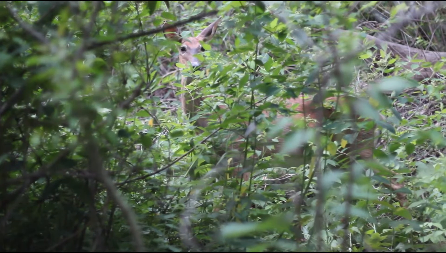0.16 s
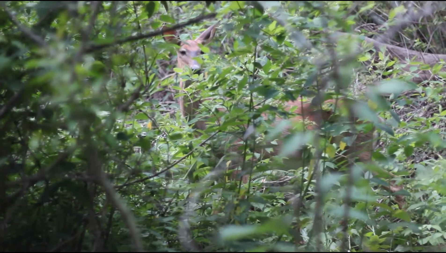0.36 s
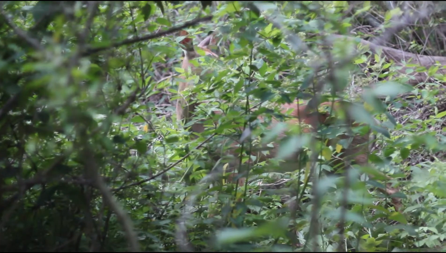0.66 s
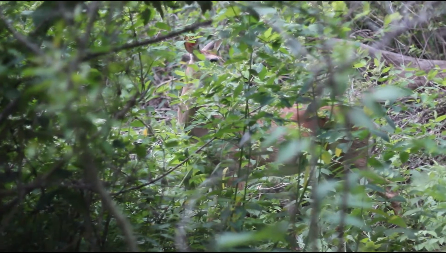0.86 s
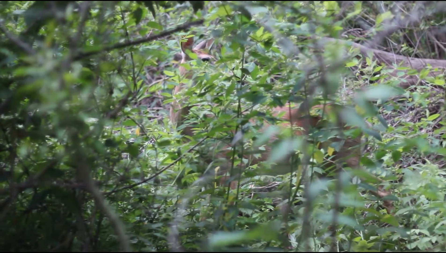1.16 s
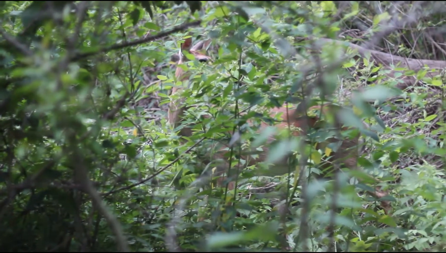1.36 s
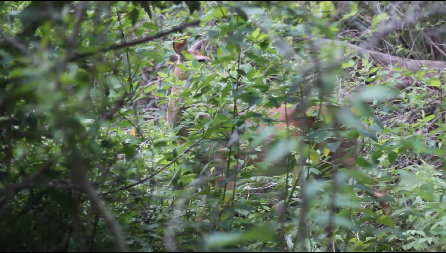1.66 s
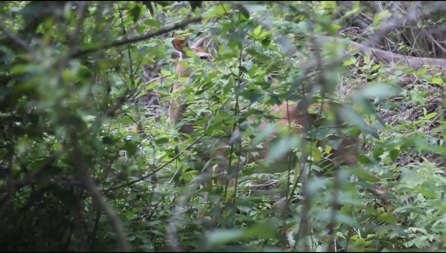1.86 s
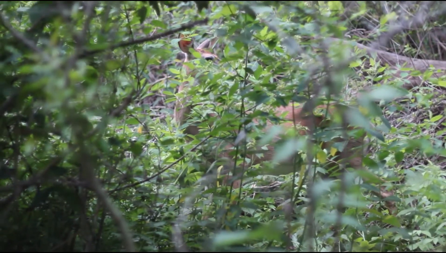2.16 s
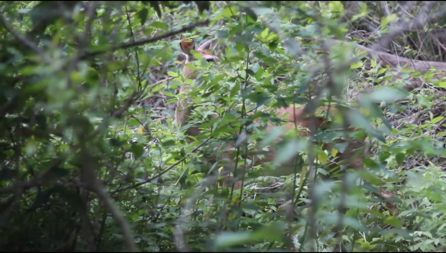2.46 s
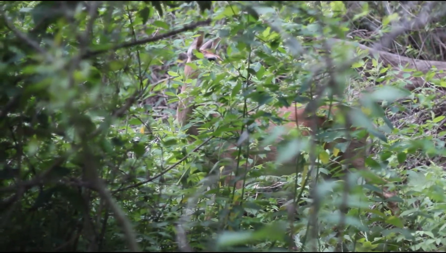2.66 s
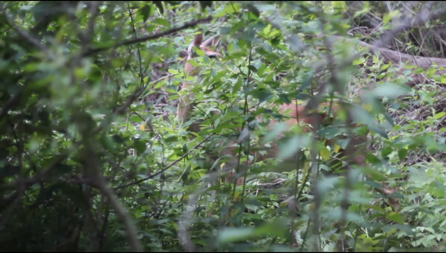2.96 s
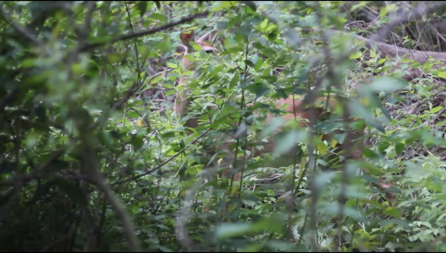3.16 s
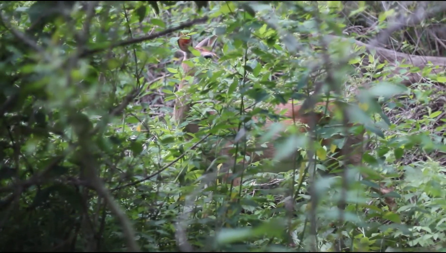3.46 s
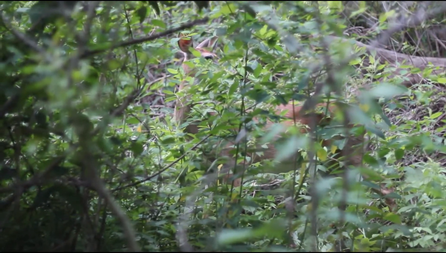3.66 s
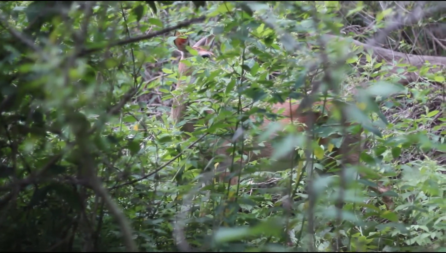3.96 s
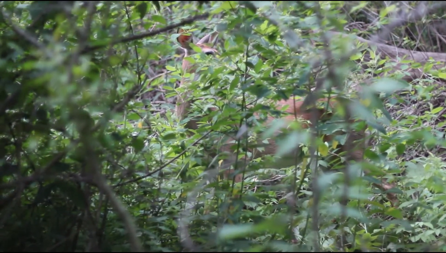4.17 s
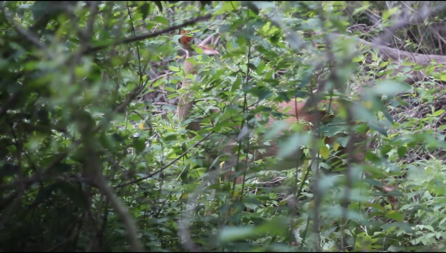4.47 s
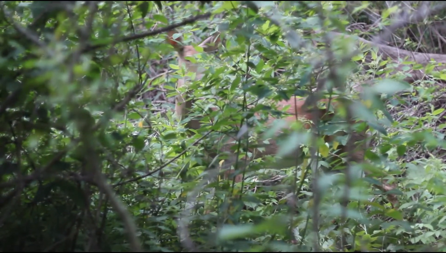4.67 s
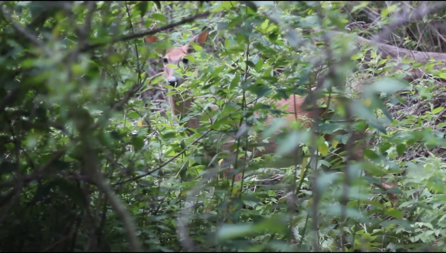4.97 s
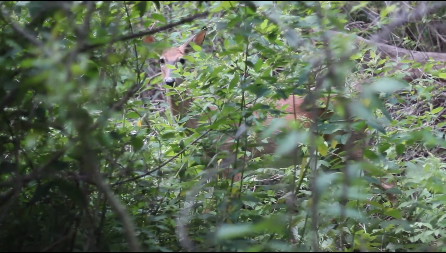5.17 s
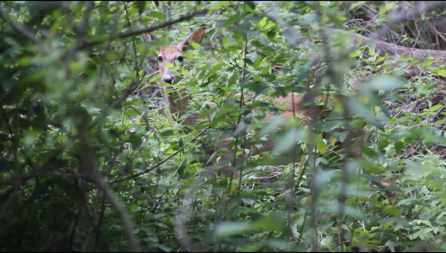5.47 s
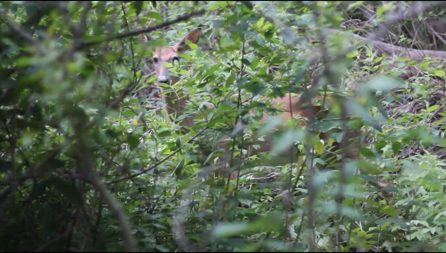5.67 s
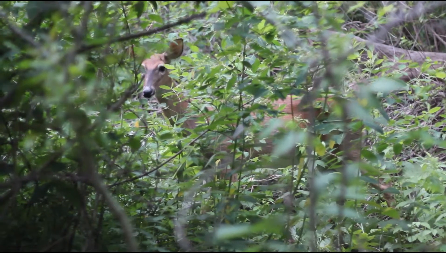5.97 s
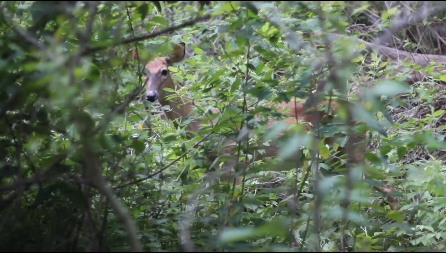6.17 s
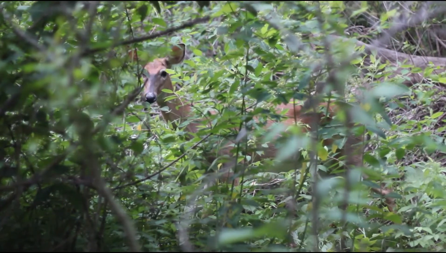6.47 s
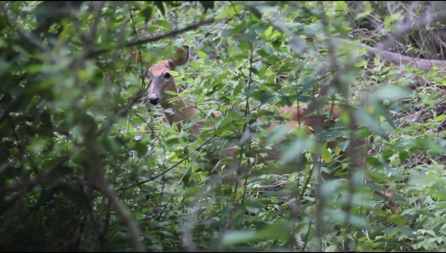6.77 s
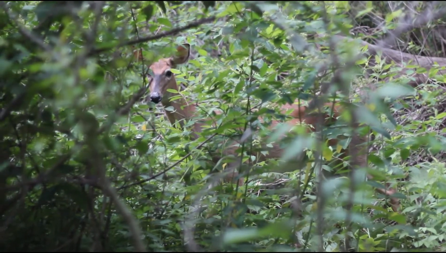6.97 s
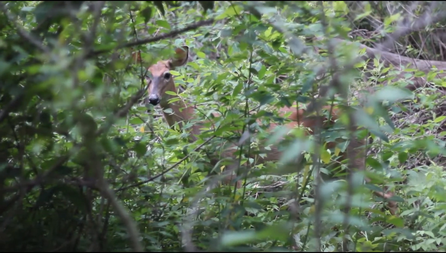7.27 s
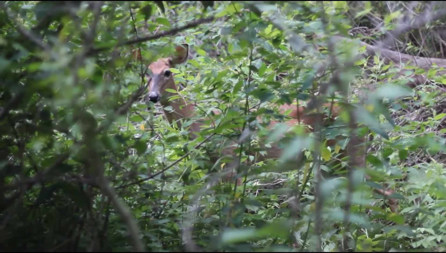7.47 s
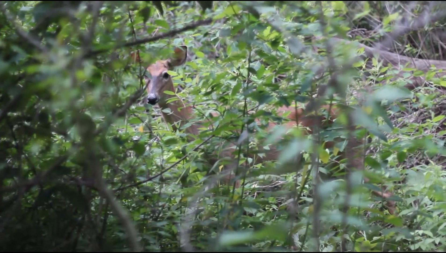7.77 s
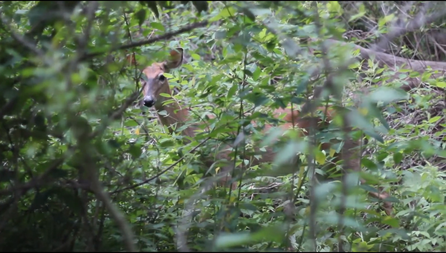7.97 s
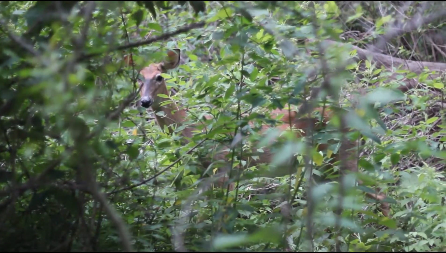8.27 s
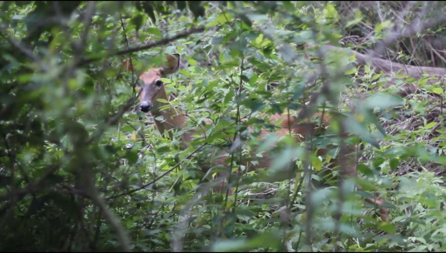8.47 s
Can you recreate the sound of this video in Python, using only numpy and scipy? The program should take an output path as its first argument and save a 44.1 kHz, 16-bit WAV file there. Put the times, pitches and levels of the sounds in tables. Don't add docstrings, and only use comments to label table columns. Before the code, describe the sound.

Woodland birdsong: quick whistled phrases and buzzy trills over hissing, ticking leaves, then a quiet stretch, a rough rasping call and thin chips.

```python
import sys
import numpy as np
from scipy import signal
from scipy.io import wavfile

SR = 44100
rng = np.random.default_rng(int(sys.argv[2]) if len(sys.argv) > 2 else 0)


def wav_out(sig):
    wavfile.write(sys.argv[1], SR, np.round(np.clip(np.atleast_2d(sig).T, -1, 1) * 32767).astype(np.int16))


def field_ratio(decibels):
    return 10 ** (np.asarray(decibels, dtype=float) / 20)


N = 379681

# frequency in Hz, level in dB per Hz.
STILL_COLOUR = [(25, -44), (60, -39), (85, -53), (160, -15), (300, -17), (550, -15.5), (1000, -14),
                (1700, -9), (5000, -16.5), (15000, -34)]
# frequency in Hz, level in dB per Hz.
LEAF_COLOUR = [(1500, -24), (3000, -10), (6000, 2.5), (8000, 1), (10500, 1.5), (13000, -2.5), (16000, -12)]
# frequency in Hz, level in dB per Hz.
RUSH_COLOUR = [(150, -34), (300, -23.5), (500, -3), (800, 1), (1150, -0.5), (1500, -12), (2200, -19.5)]
# frequency in Hz, level in dB per Hz.
CHORUS_COLOUR = [(1500, -34), (1900, -3), (2500, 0.5), (3300, 1.5), (4200, -2), (5000, -7), (7000, -30)]
# frequency in Hz, likeness from -1 to 1.
AIR_LIKENESS = [(30, 0.46), (60, -0.018), (130, -0.51), (290, 0.038), (550, -0.48), (900, -1.2),
                (1300, 0.1), (2000, -0.38), (4500, -0.22), (7000, -0.068), (15000, 0.25)]
# frequency in Hz, left minus right in dB.
AIR_LEAN = [(60, 0), (110, 3), (200, -2), (380, 2), (700, 8), (1290, 4), (2380, 0.5), (4400, 1.5),
            (8120, 0), (15000, 2.5)]
# time in seconds, level in dB.
BREEZE_LEVEL = [
    (0, -53),
    (1.1, -57.5),
    (2.1, -56.5),
    (5.0, -60),
    (5.46, -60.5),
    (5.56, -57),
    (5.75, -57.5),
    (7.05, -56),
    (7.35, -58.5),
    (8.61, -59),
]
# time in seconds, level in dB.
CHORUS_LEVEL = [(0, -54.5), (.4, -52), (.78, -48.5), (.98, -44.5), (1.17, -50), (1.6, -52.5), (2.11, -58),
                (3.55, -60), (3.72, -57), (3.94, -45), (4.08, -50.5), (4.41, -47), (4.67, -54.5),
                (5.39, -60), (5.88, -65.5), (6.23, -57), (7.05, -50.5), (7.31, -56), (7.77, -62.5),
                (8.61, -58.5)]
# start in seconds, peak in dB, pitch in Hz, left minus right in dB.
LEAF_TICKS = [(0.408, -37, 9070, -6), (0.6374, -39, 9350, -7), (1.534, -42, 8800, -6),
              (1.596, -40, 11200, -6), (1.7596, -38, 10100, -4), (1.946, -37, 10800, -5),
              (1.999, -38.5, 10030, -10), (2.078, -39, 10700, -11), (2.69, -46, 9800, -1.0),
              (2.855, -37, 10400, -3), (3.038, -43, 9400, -8), (3.058, -39, 9300, -5),
              (3.4955, -36, 9860, -6), (3.9398, -43, 10900, -2), (5.7585, -50, 9824, 11)]

# start in seconds, length in seconds, low pitch in Hz, top pitch in Hz, level in dB.
COOS = [
    (.5, 0.54, 565, 583, -80),
    (1.33, 0.13, 582, 598, -74),
    (1.5, 0.527, 563.7, 603.4, -73.5),
    (3.8, 0.96, 551.4, 600, -73.5),
]
# share of length, share of rise, level in dB.
COO_COURSE = [(0, 0.08, -1.5), (.3, 1, 4.5), (.78, 0.073, 2), (1, 0.44, -4)]
# start in seconds, length in seconds, top pitch in Hz, end pitch in Hz, level in dB.
MEWS = [
    (4.321, .405, 860, 789, -59.5),
    (6.835, .385, 864, 810, -60),
]
# share of length, share of sag, level in dB.
MEW_COURSES = [
    [(0, 0.1, -6), (.12, 0.03, -4), (.26, 0.03, 0), (.45, 0.2, 0), (0.53, .32, -7), (.93, .8, -7),
     (1, 0.99, -14)],
    [(0, 0.15, -5), (.15, 0.03, -2), (.33, 0.01, 0), (.42, 0.12, 0), (0.49, .3, -7), (.93, .85, -5),
     (1, 0.99, -12)],
]
# multiple of the pitch, level in dB.
MEW_OVERTONES = [(3, 1), (4, 1), (5, -5), (6, -6.5), (7, 3), (8, 1), (9, -9), (10, -6), (11, -23)]
# time in seconds, pitch in Hz, level in dB.
RASP_COURSE = [
    (5.88, 1008, -65),
    (6.1, 1032, -73),
    (6.4, 1008, -60),
    (6.6, 1030, -56.5),
    (6.8, 1040, -56.5),
    (7.0, 1030, -61),
    (7.15, 1054, -54),
    (7.25, 1030, -55),
    (7.29, 1063, -66),
]
# multiple of the pitch, level in dB.
RASP_OVERTONES = [(2, -16), (3, -1), (4, 0.5), (5, -35)]
# start in seconds, level in dB, start pitch in Hz, end pitch in Hz.
THIN_CHIPS = [
    (7.953, -58.5, 7300, 5500),
    (8.019, -57.5, 7000, 5400),
    (8.078, -61, 6710, 5000),
    (8.142, -62, 6600, 5200),
]

# start in seconds, length in seconds, from pitch in Hz, to pitch in Hz, level in dB.
SLUR_NOTES = [(.255, 0.057, 2850, 2970, -52), (.4, 0.078, 3210, 3300, -57), (.585, 0.089, 3750, 4700, -65),
              (.62, .09, 2775, 2930, -58.5), (1.422, 0.085, 3840, 4790, -48.5),
              (1.84, 0.076, 5700, 5770, -63), (2.08, 0.059, 3700, 4000, -60.5),
              (2.4, 0.062, 4280, 4710, -57), (2.7, 0.05, 3660, 4200, -60), (3.568, 0.053, 4120, 4200, -50),
              (3.555, 0.03, 5500, 5620, -56), (3.59, .05, 5750, 5900, -57)]
# share of length, share of glide, level in dB.
SLUR_COURSE = [(0, 0, -2), (.45, .78, 0.5), (.7, 0.94, 0), (1, 1, 2)]
# start in seconds, length in seconds, from pitch in Hz, to pitch in Hz, level in dB.
SWEEP_NOTES = [
    (1.6, 0.053, 2270, 3600, -61),
    (4.1, 0.027, 3120, 3470, -55),
    (7.38, 0.14, 3150, 4170, -60),
    (7.97, 0.065, 1990, 2920, -63.5),
    (8.08, 0.105, 2580, 2780, -54),
    (8.19, 0.063, 2950, 3050, -53),
    (8.18, 0.033, 3200, 3250, -58),
    (8.28, 0.059, 3100, 2910, -51),
    (8.455, 0.029, 3250, 4000, -52),
    (8.4, 0.054, 2800, 2900, -52.5),
]
# share of length, share of glide, level in dB.
SWEEP_COURSE = [(0, 0, -3.5), (.6, .6, -5), (1, 0.97, -4.5)]
# start in seconds, length in seconds, edge pitch in Hz, top pitch in Hz, level in dB.
PIP_NOTES = [(.64, 0.062, 3340, 3130, -65), (1.437, 0.042, 2150, 2430, -51), (1.62, .015, 3700, 3760, -54),
             (.195, .03, 2540, 2570, -58), (3.24, .04, 4000, 4020, -54), (2.39, 0.05, 4150, 4340, -50),
             (2.4, .04, 6760, 6800, -70), (2.44, 0.03, 3770, 3800, -58), (2.8, 0.047, 3500, 3540, -55.5),
             (3.52, 0.031, 2990, 3050, -52.5), (3.605, 0.043, 3550, 3780, -52),
             (3.73, 0.057, 3800, 4220, -51), (3.91, 0.043, 4510, 4510, -55),
             (3.95, 0.074, 5100, 5330, -56.5), (7.1, 0.13, 3230, 3240, -56)]
# share of length, share of arch, level in dB.
PIP_COURSE = [(0, 0, -3), (.22, .75, 1), (.45, 1, 1), (.7, .8, -1), (1, 0.2, -5)]
# start in seconds, length in seconds, from pitch in Hz, to pitch in Hz, level in dB.
PIPE_NOTES = [(.4, 0.084, 1980, 2170, -52.5), (1.59, 0.034, 1853, 1896, -55),
              (1.632, 0.037, 2120, 2165, -56), (1.83, 0.064, 2105, 2150, -63),
              (2.72, 0.074, 4110, 4140, -63), (3.93, 0.081, 1950, 2145, -56),
              (4.05, 0.04, 4080, 4130, -54.5), (6.235, 0.1, 4250, 4400, -59),
              (7.66, 0.26, 3540, 4070, -69.5), (8.08, 0.059, 2100, 2120, -66.5),
              (8.19, 0.09, 2120, 2150, -66), (8.37, 0.069, 2560, 2560, -63)]
# share of length, share of glide, level in dB.
PIPE_COURSE = [(0, 0.02, -7), (0.5, 0.86, -1), (1, 1, -5.5)]
# start in seconds, length in seconds, from pitch in Hz, to pitch in Hz, level in dB.
BURR_NOTES = [
    (3.83, 0.11, 4560, 6030, -57),
]
# share of length, share of glide, level in dB.
BURR_COURSE = [(0, 0.04, -27), (.12, .08, -18), (.3, 0.2, -10), (.68, .65, -3.5), (.83, .8, -1),
               (.91, 0.92, -6.5), (1, 1, -6)]
# time in seconds, pitch in Hz, level in dB.
LONG_BURRS = [
    [(.276, 1556, -64), (.3, 1750, -62), (.322, 2085, -55), (.386, 2850, -48), (.4, 3170, -58),
     (.415, 3290, -60)],
    [(1.47, 2850, -56), (1.51, 2835, -54), (1.534, 2900, -47.5), (1.564, 3200, -52), (1.61, 3320, -55),
     (1.625, 3300, -64)],
    [(3.722, 1260, -70), (3.772, 1740, -61), (3.81, 2196, -53), (3.86, 2416, -51.5), (3.926, 2754, -47),
     (3.96, 3140, -49.5), (3.98, 3240, -56), (3.995, 3200, -65)],
    [(4.115, 2400, -66), (4.15, 2665, -54.5), (4.18, 2880, -54), (4.22, 3045, -55), (4.28, 3250, -53),
     (4.3, 3260, -64)],
]
# start in seconds, length in seconds, from pitch in Hz, to pitch in Hz, level in dB.
CHURR_NOTES = [(.25, 0.077, 2600, 2490, -55.5), (1.4, .09, 2950, 2850, -59), (2.32, 0.044, 2960, 2980, -62),
               (3.05, .05, 2650, 2953, -64), (3.15, .06, 3000, 2970, -65), (1.115, 0.1, 4000, 4800, -54.5),
               (2.36, 0.051, 2800, 2880, -61), (2.39, 0.065, 4030, 4500, -60),
               (2.44, 0.035, 2695, 2700, -64), (2.86, 0.037, 3240, 3180, -64),
               (2.935, 0.021, 3050, 3000, -71), (3.102, 0.017, 3000, 4420, -53),
               (3.74, 0.041, 2610, 2670, -61), (3.795, 0.052, 3240, 3300, -57),
               (3.89, 0.056, 3920, 4050, -55.5), (3.92, 0.063, 5640, 5930, -55.5),
               (6.07, 0.031, 2730, 2870, -60), (6.148, 0.026, 3200, 4160, -55),
               (6.17, 0.11, 2670, 3230, -63), (6.27, 0.22, 2364, 3295, -58.5),
               (4.2, 0.033, 7060, 7260, -56), (4.235, 0.07, 5520, 6360, -51),
               (4.505, 0.039, 4045, 4180, -54), (4.7, .3, 2157, 2076, -65.5),
               (5.02, 0.305, 2100, 2050, -67), (.8, 0.059, 5000, 5700, -57), (3.68, 0.093, 4050, 4110, -63)]
# start in seconds, length in seconds, edge pitch in Hz, top
# pitch in Hz, level in dB.
ARCH_NOTES = [
    (1.165, 0.074, 2400, 2485, -50.5),
    (2.697, .1, 2255, 2690, -55.5),
    (3.112, 0.104, 3780, 4210, -50.5),
]
# share of length, share of arch, level in dB.
ARCH_COURSE = [(0, 0, 1), (.2, .6, -1.5), (.42, 0.99, 1), (.7, .7, -5), (1, 0.051, -5)]
# left minus right in dB, lag of the left side in samples.
PLACES = [
    (1, -3.5),
    (0, 8.5),
    (2, 6.5),
    (13, 15),
    (1, -2),
    (-1.5, 3),
    (3.5, 4.5),
]

# start in seconds, length in seconds, lowest pitch in Hz, level in dB.
BUZZ_LOW = [
    (.672, .39, 1630, -42.5),
    (4.2, .38, 1790, -44),
    (3.76, 0.29, 1000, -67),
]
# pitch in Hz, level in dB, left minus right in dB.
BUZZ_TOP = [
    (3500, -45.5, -3.5),
    (3600, -43, 3.5),
    (3710, -53, 2.5),
]
# time of a pulse in seconds, pulses per second, tires from in seconds, slowing per second per second.
BUZZ_PULSES = [
    (.7085, 78.5, .8285, 68),
    (4.2114, 79.3, 4.3114, 49),
    (3.7913, 68, 3.8, 12),
]
# share of length, share of climb, level in dB.
BUZZ_COURSES = [
    [(0, 0, -14.5), (.2, .22, -12.5), (.4, .38, -7), (.6, .48, 1.5), (.9, .55, -2), (.97, .58, -2.5),
     (1, .58, -6)],
    [(0, 0.0, -22), (.16, .1, -6), (.55, .35, -1), (.68, .48, 2.5), (.87, .7, 2), (.95, 0.72, -0.5),
     (1, 0.67, -10)],
    [(0, 0, -13), (.17, .3, -15), (.6, 0.75, -1), (.88, .82, -10), (.97, 0.8, -14), (1, 0.65, -14)],
]
BUZZ_WIDTHS = [
    (.95, .8),
    (1.25, 0.069),
    (0.92, 0.47),
]


def in_time(rows, fade_s=.008):
    s, *columns = np.transpose(rows)
    at = np.arange(int((s[0] - fade_s) * SR), min(N, int((s[-1] + fade_s) * SR)))
    edge = np.clip(np.minimum(at - at[0], at[-1] - at) / (2 * fade_s * SR), 0, 1)
    return at, edge, [np.interp(at / SR, s, c) for c in columns]


def at_hz(points, hz):
    point_hz, value = np.transpose(points)
    return np.interp(np.log(hz), np.log(point_hz), value)


def drift(rate_hz):
    r = np.exp(-16 * np.pi * rate_hz / SR)
    slow = signal.lfilter([1], [1, -2 * r, r * r], rng.standard_normal(N // 8 + 4002))[4000:]
    return np.interp(np.arange(N) / 8, np.arange(len(slow)), slow / slow.std())


def turns(hz):
    return 2 * np.pi * np.cumsum(hz) / SR


def band(low_hz, high_hz, sound):
    return signal.sosfilt(signal.butter(2, [low_hz, high_hz], "band", fs=SR, output="sos"), sound)


def add(out, at, sound, pan_db, lag=0):
    out[0, np.minimum(at + round(lag), N - 1)] += np.sqrt(2) * sound * field_ratio(pan_db / 2)
    out[1, at] += np.sqrt(2) * sound * field_ratio(-pan_db / 2)


def sung(rows, course):
    return [[(s + u * length, a_hz + glide * (b_hz - a_hz), db + d) for u, glide, d in course]
            for s, length, a_hz, b_hz, db in rows]


def air():
    t = np.arange(N) / SR
    leaf_db = np.interp(t, *np.transpose(BREEZE_LEVEL))
    chorus_db = np.interp(t, *np.transpose(CHORUS_LEVEL))
    clear = np.clip((t - 5.43) / 0.27, 0, 1)
    rush_db = (1 - clear) * (-73.5 + 1.46 * t) + clear * -58.5
    leaf_db = leaf_db + 1.05 * drift(22)
    out = 0
    white = rng.standard_normal((2, 2, N))
    edges = 22 * 2 ** (np.arange(30) / 3)
    for k, (low, high) in enumerate(zip(edges, edges[1:])):
        mid, side = band(low, high, white[k % 2])
        hz = np.sqrt(low * high)
        still = field_ratio(2 * (-61.5 + at_hz(STILL_COLOUR, hz) + 19.5))
        leaves = field_ratio(2 * (leaf_db + at_hz(LEAF_COLOUR, hz) + 7))
        rush = field_ratio(2 * (rush_db + at_hz(RUSH_COLOUR, hz) + 14))
        chorus = field_ratio(2 * (chorus_db + at_hz(CHORUS_COLOUR, hz) + 11.5 + 1.7 * drift(5.3)))
        power = still + leaves + rush + chorus
        usual = at_hz(AIR_LIKENESS, hz)
        alike = np.clip(usual + (0.73 - usual) * rush / power, -.95, .95)
        lean = field_ratio(at_hz(AIR_LEAN, hz) / 2)
        pair = np.sqrt((1 + alike) / 2) * mid + np.sqrt((1 - alike) / 2) * side * [[1], [-1]]
        out = out + np.sqrt(power) * pair * [[lean], [1 / lean]]
    return out


def scatter(t60_s, db, rise_s):
    t = np.arange(int(1.2 * SR)) / SR
    tail = rng.standard_normal((2, len(t))) * field_ratio(-60 * t / t60_s) * np.clip(t / rise_s, 0, 1)
    tail = signal.lfilter([1], [1, -.35], tail)
    return field_ratio(db) * tail / np.sqrt((tail ** 2).sum(axis=1, keepdims=True))


def wood(dry):
    trunks = scatter(t60_s=0.6, db=-11, rise_s=0.029)
    twigs = scatter(t60_s=.025, db=-8, rise_s=0.00077)
    return signal.fftconvolve(dry, trunks + twigs, axes=1)[:, :N]


def knock():
    out, at = np.zeros((2, N)), np.arange(int(0.034 * SR))
    push = np.hanning(len(at)) * np.sin(2 * np.pi * at / len(at))
    add(out, int(6.36 * SR) + at, field_ratio(-72) * push, pan_db=0.0)
    return out


def ticks():
    out, at = np.zeros((2, N)), np.arange(200)
    grit = rng.standard_normal((len(LEAF_TICKS), 200))
    for (s, db, hz, pan_db), g in zip(LEAF_TICKS, grit):
        snap = np.exp(-at / SR / 0.00069) * (np.sin(2 * np.pi * hz * at / SR) + g)
        add(out, int(s * SR) + at, field_ratio(db - 4.0) * snap, pan_db)
    return band(5000, 12500, out + 1e-18)


def throat(calls, overtones, wobble, wobble_hz, pan_db, lag):
    out, shake, swell = np.zeros((2, N)), drift(wobble_hz), drift(23)
    for call in calls:
        at, edge, (hz, db) = in_time(call, fade_s=.015)
        phase = turns(hz * (1 + wobble * shake[at]))
        voice = 0
        for k, overtone_db in overtones:
            own_swell = swell[at - int(4000 * k)]
            voice = voice + field_ratio(overtone_db + 1.5 * own_swell) * np.sin(k * phase + k * k)
        add(out, at, edge * field_ratio(db) * voice, pan_db, lag)
    return out


def dove():
    return throat(sung(COOS, COO_COURSE), [(0.99, 0)], wobble=0.0388, wobble_hz=25.7, pan_db=8.0, lag=23.4)


def rasp():
    return throat([RASP_COURSE], RASP_OVERTONES, wobble=0.0453, wobble_hz=69.04, pan_db=5.0, lag=4.86)


def mews():
    calls = [sung([call], course)[0] for call, course in zip(MEWS, MEW_COURSES)]
    return throat(calls, MEW_OVERTONES, wobble=0.0055, wobble_hz=30.2, pan_db=-7, lag=0)


def chips():
    out, at = np.zeros((2, N)), np.arange(int(0.018 * SR))
    for s, db, start_hz, end_hz in THIN_CHIPS:
        tone = np.sin(turns(np.linspace(start_hz, end_hz, len(at))))
        add(out, int(s * SR) + at, field_ratio(db) * np.hanning(len(at)) * tone, pan_db=10.0)
    return out


def whistles():
    out, quaver, flutter = np.zeros((2, N)), drift(81.0), drift(40)
    # quaver as a share of pitch, shake in Hz, shake in dB, octave in dB
    plain, burry, hoarse = (0.016, 0, 0, -23), (.028, 140, 0.5, -15), (0.034, 0, 0, -23)
    kinds = [(sung(SLUR_NOTES, SLUR_COURSE), plain),
             (sung(SWEEP_NOTES, SWEEP_COURSE), plain),
             (sung(PIP_NOTES, PIP_COURSE), plain),
             (sung(PIPE_NOTES, PIPE_COURSE), plain),
             (sung(BURR_NOTES, BURR_COURSE) + LONG_BURRS, burry),
             (sung(CHURR_NOTES, PIPE_COURSE), hoarse),
             (sung(ARCH_NOTES, ARCH_COURSE), plain)]
    for (notes, (quaver_share, shake_hz, shake_db, octave_db)), (pan_db, lag) in zip(kinds, PLACES):
        for note in notes:
            at, edge, (hz, db) = in_time(note)
            shake = np.sin(2 * np.pi * 66.5 * at / SR + 1.27)
            phase = turns(hz * (1 + quaver_share * quaver[at]) + shake_hz * shake)
            level = field_ratio(db + 0.5 + 1.65 * flutter[at] + shake_db * shake)
            tone = np.sin(phase) + field_ratio(octave_db) * np.sin(2 * phase)
            add(out, at, edge * level * tone, pan_db, lag)
    return out


def buzzes():
    out, uneven, reach, rattle = np.zeros((2, N)), drift(26.4), drift(122.0), drift(152.7)
    breath = band(2700, 5600, rng.standard_normal(N))
    breath /= breath.std()
    for low_row, top_row, pulse_row, course, (width, follows) in zip(
            BUZZ_LOW, BUZZ_TOP, BUZZ_PULSES, BUZZ_COURSES, BUZZ_WIDTHS):
        s, length, hz, db = low_row
        top_hz, top_db, pan_db = top_row
        pulse_s, rate, tires_s, slowing = pulse_row
        climb = sung([(s, length, hz, hz + 600, db)], course)[0]
        at, edge, (low_hz, low_db) = in_time(climb)
        swing_hz = width * .42 * (low_hz - 760)
        high_db = top_db + follows * (low_db - db)
        t = at / SR
        pulses = rate * (t - pulse_s) - slowing / 2 * np.maximum(t - tires_s, 0) ** 2
        shake = 2 * np.pi * pulses + 0.14 * uneven[at]

        phase = turns(low_hz + swing_hz * (1 + 0.1 * reach[at]) * np.cos(shake / 2 + 0.16) ** 2)
        low_db = low_db + 2.5 * np.cos(shake - 0.9) + 1.5 * np.cos(2 * shake - 2.8) + 0.54 * rattle[at]
        low = np.sin(phase) + field_ratio(-19) * np.sin(2 * phase) + field_ratio(-16.0) * np.sin(3 * phase)
        add(out, at, edge * field_ratio(low_db) * low, pan_db=4.5, lag=-8.0)

        phase = turns(top_hz + 747 * (np.cos(shake + 0.36) + 0.29 * rattle[at]))
        pulse = np.cos(shake - 0.6)
        high = np.sin(phase) + field_ratio(-17) * np.sin(2 * phase)
        high = field_ratio(high_db + 9.5 * (pulse - 1.4) + 2.3 * reach[at]) * high
        high += field_ratio(high_db - 3 + 9 * (pulse - 1)) * breath[at]
        add(out, at, edge * high, pan_db, lag=-4.0)
    return out


def scene():
    birds = mews() + rasp() + dove() + whistles() + buzzes() + chips()
    return field_ratio(3.0) * (birds + wood(birds)) + ticks() + knock() + air()


def low_pass(x):
    return signal.sosfilt(signal.butter(12, 15740, fs=SR, output="sos"), x)


def record(dry):
    return low_pass(dry)


dry = scene()
out = record(dry)
wav_out(out)
```